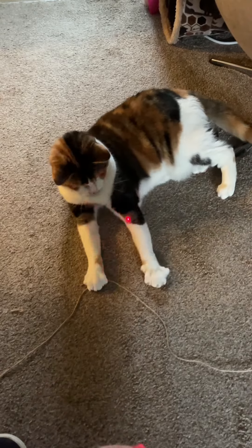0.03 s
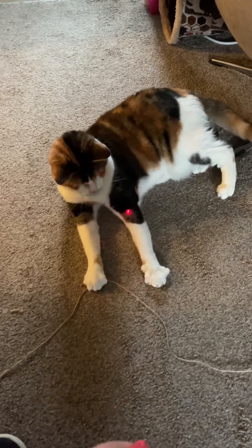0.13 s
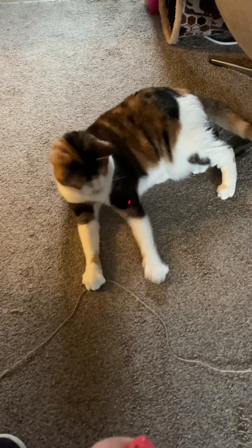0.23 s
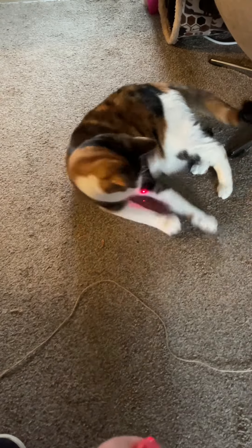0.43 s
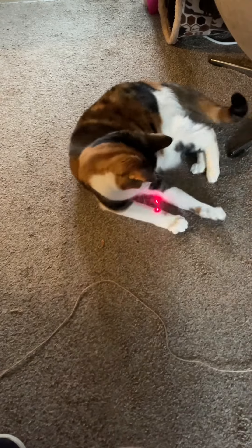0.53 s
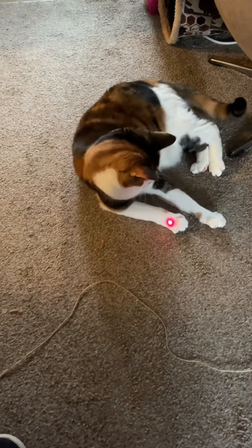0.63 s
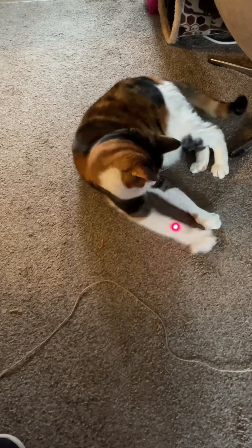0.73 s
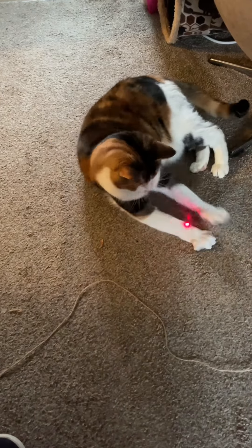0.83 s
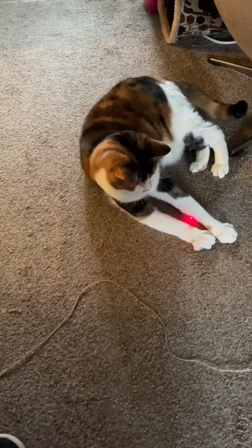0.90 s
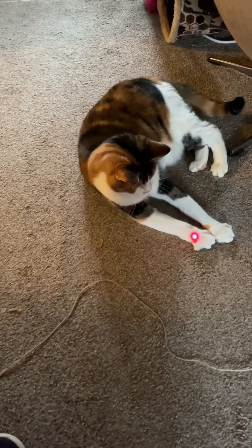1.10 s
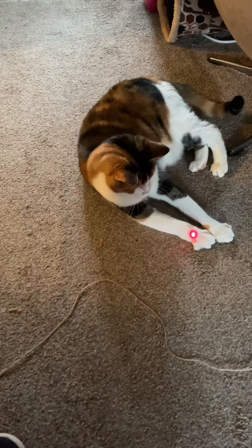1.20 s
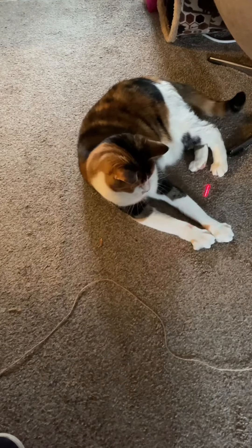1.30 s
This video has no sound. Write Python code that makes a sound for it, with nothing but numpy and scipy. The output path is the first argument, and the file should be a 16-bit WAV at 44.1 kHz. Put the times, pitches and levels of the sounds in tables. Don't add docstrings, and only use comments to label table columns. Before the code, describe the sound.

Soft, dull paw thumps and scuffs on carpet, with small claw snags, as a cat pounces indoors

```python
import sys
import numpy as np
from scipy import signal
from scipy.fft import irfft
from scipy.io import wavfile

SR = 44100
rng = np.random.default_rng(int(sys.argv[2]) if len(sys.argv) > 2 else 0)


def decibels_to_gain(level_db):
    exponent = np.asarray(level_db, float) / 20
    return 10 ** exponent


def unload_wav(signal):
    wavfile.write(
        sys.argv[1],
        SR,
        np.round(np.clip(np.atleast_2d(signal).T, -1, 1) * 32767).astype(np.int16),
    )


N = 59535

SIZE = 8192
HZ = np.maximum(np.arange(SIZE // 2 + 1), 1) * SR / SIZE
EDGES_HZ = 28 * 2 ** np.arange(0, 9.6, .5)
CENTRES_HZ = np.sqrt(EDGES_HZ[:-1] * EDGES_HZ[1:])


def rms_one(x):
    return x / np.sqrt(np.mean(x ** 2) + 1e-20)


def at_hz(points, hz):
    points_hz, values = np.transpose(points)
    return np.interp(np.log(hz), np.log(points_hz), values)


def drift(changes, count):
    knots = rng.standard_normal(400)
    return np.interp(np.arange(count) / count * changes, np.arange(400), knots)


def bands(x, gains):
    total = 0
    for k, gain in enumerate(gains):
        band = signal.butter(2, EDGES_HZ[k:k + 2], "band", fs=SR, output="sos")
        total = total + gain * signal.sosfilt(band, x[k % 2])
    return total


def air():
    # (frequency [Hz], density [dB per Hz])
    air_colour = [(18, -62), (30, -32), (55, 0), (139, -4), (217, -12), (506, -14.5), (732, -19.5),
                  (10500, -35), (16500, -45.5)]
    level_db, patchy_db, top_hz = -61.5, 1.76, 14500
    gains = [decibels_to_gain(db + patchy_db * drift(25, count=N)) for db in at_hz(air_colour, CENTRES_HZ)]
    noise = bands(rng.standard_normal((2, N)), gains)
    top = signal.butter(8, top_hz, fs=SR, output="sos")
    return decibels_to_gain(level_db) * rms_one(signal.sosfilt(top, noise))


def rubbing():
    # (time [s], level [dB], brushing hiss [dB])
    rub_course = [(0.189, -83.5, -106), (0.213, -47, -62), (.25, -46.5, -51.5), (0.289, -54.5, -59),
                  (0.308, -37, -49), (.36, -39, -59), (.44, -49, -60.5), (.52, -54.5, -68.5),
                  (0.612, -81, -95.5), (0.629, -42, -57), (.67, -34, -52), (0.709, -51.5, -63),
                  (.74, -52, -59), (.79, -42.5, -59.5), (.83, -60.5, -75), (.9, -75.5, -87)]
    # (frequency [Hz], density [dB per Hz])
    rub_colour = [(88, -31.5), (150, 0.5), (414, -8.5), (837, -13.5), (1600, -16.5), (2920, -21),
                  (4240, -34.5), (8900, -48), (16000, -55)]
    # (frequency [Hz], density [dB per Hz])
    hiss_colour = [(700, -14.5), (1500, -5.5), (4000, -0.5), (8000, -6), (12000, -14.5), (16000, -26)]
    fibres_per_s, fibre_spread_db, smooth_share, lumps_db = 1500, 2.5, 0.5, 2.5

    sizes_db = fibre_spread_db * np.minimum(rng.exponential(1, (2, N)), 5)
    sizes = decibels_to_gain(sizes_db) * rng.choice([-1, 1], (2, N))
    releases = sizes * (rng.random((2, N)) < fibres_per_s / SR)
    friction = rms_one(releases) + smooth_share * rng.standard_normal((2, N))

    times_s, rub_db, hiss_db = np.transpose(rub_course)
    t = np.arange(N) / SR
    dull = rms_one(bands(friction, decibels_to_gain(at_hz(rub_colour, CENTRES_HZ))))
    bright = rms_one(bands(friction[::-1], decibels_to_gain(at_hz(hiss_colour, CENTRES_HZ))))
    rub = decibels_to_gain(np.interp(t, times_s, rub_db)) * dull
    hiss = decibels_to_gain(np.interp(t, times_s, hiss_db)) * bright
    return decibels_to_gain(lumps_db * drift(150, count=N)) * (rub + hiss)


def hump(centre_hz, octaves):
    return np.exp(-.5 * (np.log2(HZ / centre_hz) / octaves) ** 2)


def pile_body():
    # (frequency [Hz], Q, gain [dB])
    resonances = [(481, 4.8, 8), (1080, 3.3, 4), (293, 2.4, -8), (940, 9.2, -5.0), (2400, 1, -2),
                  (3450, 3.0, 4), (7100, 9, -4.5), (9300, 2.5, 2)]
    response = 1
    for centre_hz, q, gain_db in resonances:
        u = 1j * HZ / centre_hz
        root_gain = decibels_to_gain(gain_db / 2)
        response = response * (1 + u * root_gain / q + u * u) / (1 + u / root_gain / q + u * u)
    return response


def band_slopes(from_hz, to_hz):
    return 1 / np.sqrt((1 + (from_hz / HZ) ** 4) * (1 + (HZ / to_hz) ** 4))


def carpet_wave(time_s, colour):
    contact_db, slips_s, slips_db = 20, .0012, -5.5
    delay_1khz_s, delay_power, delay_knee_hz = 0.0011, 1.24, 85.3
    lead = 512

    slips = 1
    for size, late in rng.random((3, 2)):
        slips = slips + decibels_to_gain(slips_db) * (2 * size - 1) * np.exp(-2j * np.pi * HZ * slips_s * late)
    spread_s = delay_1khz_s * (np.hypot(HZ, delay_knee_hz) / 1000) ** -delay_power
    lag_s = lead / SR + time_s % (1 / SR) + spread_s
    phase = -2j * np.pi * np.cumsum(lag_s) * SR / SIZE
    pulse = irfft(decibels_to_gain(contact_db) * colour * slips * np.exp(phase), SIZE)
    start = int(time_s * SR) - lead
    return np.pad(pulse, (start, N))[:N]


def claw_snaps():
    # (time [s], level [dB], softness corner [Hz], crack [dB], floor push [dB])
    snap_events = [(.2269, -17, 2010, -36, 6), (.2283, -11.5, 860, -31.5, 1.5),
                   (.2975, -6, 395, -44.5, -8.5), (.3035, -8.5, 360, -54, -8.5),
                   (.312, -5, 525, -42.5, 3.5), (.3155, -3, 610, -56, -9), (.3228, -23.5, 700, -30.5, -6),
                   (.3328, 5.5, 771.5, -33, -14), (.395, -11.5, 1282, -17, 1.5),
                   (.4118, -8.5, 1200, -25, 4), (.4285, -24, 698, -35.5, -4.5),
                   (.4745, -16.5, 1100, -20, 7.5), (.6421, -0.5, 1600, -72.5, 4.5),
                   (.655, -18.5, 1180, -36.5, -8), (.666, -14.5, 1470, -49, 13.5),
                   (.670, -15.5, 900, -32, -4), (.674, -10, 890, -38.5, 0.5), (.7015, -35, 600, -51, -1),
                   (.725, -25, 1000, -20, 11), (.728, -27, 1100, -32, 2), (.735, -17.5, 448, -50, 13),
                   (.7655, -43.5, 1500, -14, -4), (.780, -9.5, 700, -31, 2)]
    pad_q = 0.86
    pile = pile_body() * band_slopes(350, 6500)
    crack = band_slopes(2500, 13200)
    push = hump(115, .7)
    out = np.zeros(N)
    for time_s, level_db, corner_hz, crack_db, push_db in snap_events:
        pad = pile / np.hypot(1 - (HZ / corner_hz) ** 2, HZ / corner_hz / pad_q)
        colour = pad + decibels_to_gain(crack_db) * crack + decibels_to_gain(push_db) * push
        out += carpet_wave(time_s, decibels_to_gain(level_db) * colour)
    return out


def thumps():
    # (time [s], level [dB], pitch [Hz])
    thump_events = [(.229, -10, 140), (.672, -4.5, 115), (.303, 3, 170), (.405, -7, 75), (.497, -7.5, 69.2),
                    (.301, 11, 100), (.349, 1.5, 70), (.375, -9, 100.2), (0.52, -16, 90), (.515, -15, 95),
                    (.333, -4, 200), (.738, -2.5, 95), (.825, -17.5, 100), (.882, -11.5, 105),
                    (0.83, -20.5, 90)]
    out = np.zeros(N)
    for time_s, level_db, pitch_hz in thump_events:
        out += carpet_wave(time_s, decibels_to_gain(level_db) * hump(pitch_hz, .6))
    return out


def room(x):
    # (frequency [Hz], T60 [s])
    room_t60 = [(80, 0.39), (300, .3), (1000, .26), (4000, .22), (12000, 0.05)]
    # (frequency [Hz], level [dB])
    room_colour = [(80, -6.5), (300, -9), (1000, -13), (4000, -10.5), (12000, -17.5)]
    echo_s, echo_db, echo_cut_hz = .003, -14, 4000

    t = np.arange(SR // 2) / SR
    t60_s = at_hz(room_t60, CENTRES_HZ)[:, None]
    decay_db = at_hz(room_colour, CENTRES_HZ)[:, None] - 60 * t / t60_s
    gains = decibels_to_gain(decay_db) / np.sqrt(t60_s * SR / 14)
    onset = np.clip((t - .003) / .004, 0, 1)
    tail = bands(rng.standard_normal((2, len(t))), gains) * onset

    dull = signal.sosfilt(signal.butter(1, echo_cut_hz, fs=SR, output="sos"), x)
    echo = np.interp(np.arange(N) - echo_s * SR, np.arange(N), dull)
    return decibels_to_gain(echo_db) * echo + signal.fftconvolve(x, tail)[:N]


def scene():
    cat = rubbing() + claw_snaps() + thumps()
    return (cat + room(cat) + air())[None]


def low_pass(x):
    return signal.sosfilt(signal.butter(12, 17000, fs=SR, output="sos"), x)


def record(dry):
    bass_cut = signal.butter(3, 60.3, "high", fs=SR, output="sos")
    top_cut = signal.cheby2(12, 70, 17400, fs=SR, output="sos")
    mix = signal.sosfilt(top_cut, signal.sosfilt(bass_cut, dry))
    return low_pass(mix)


dry = scene()
out = record(dry)
unload_wav(out)
```